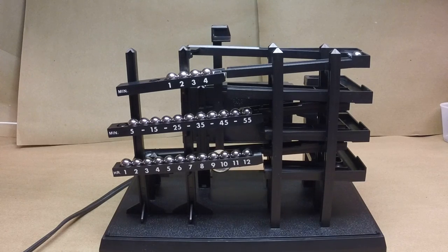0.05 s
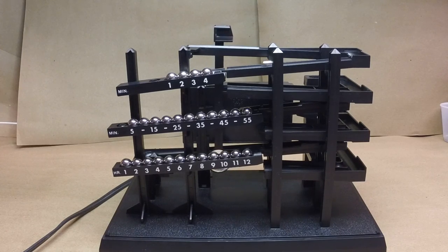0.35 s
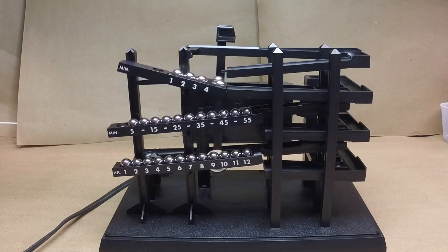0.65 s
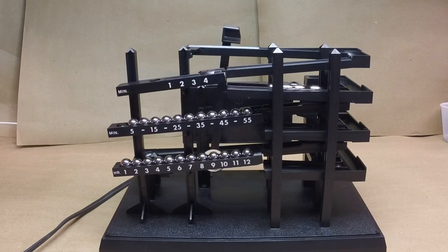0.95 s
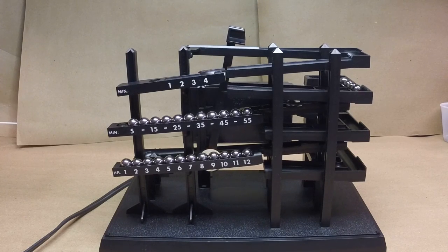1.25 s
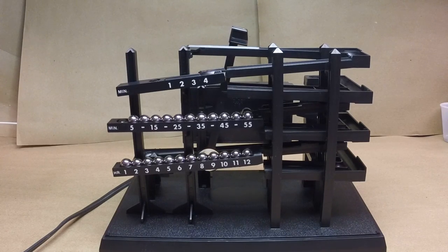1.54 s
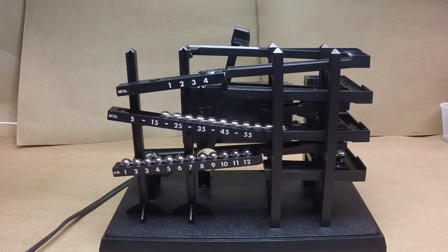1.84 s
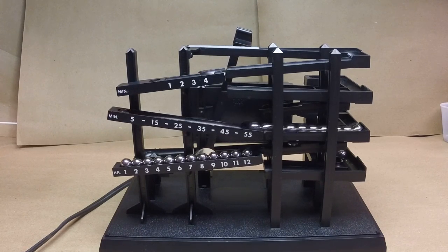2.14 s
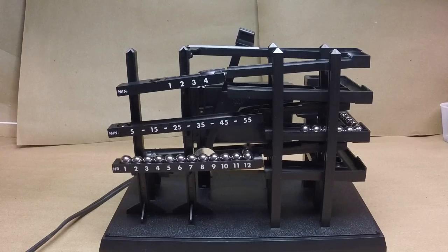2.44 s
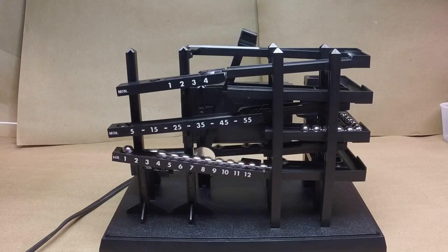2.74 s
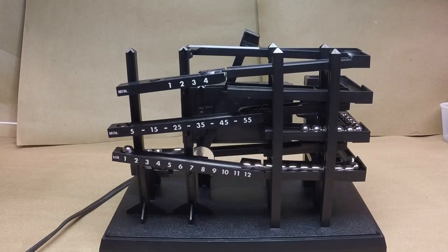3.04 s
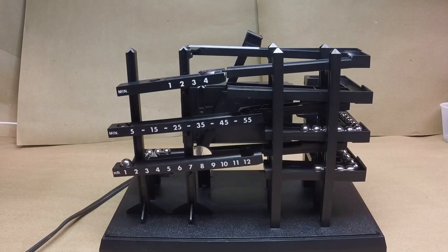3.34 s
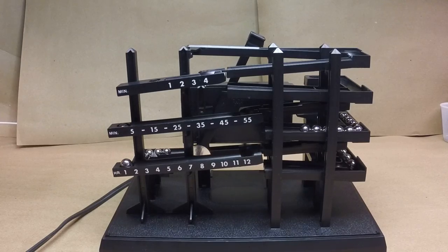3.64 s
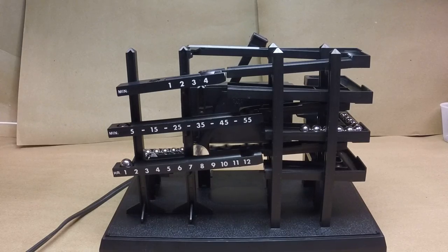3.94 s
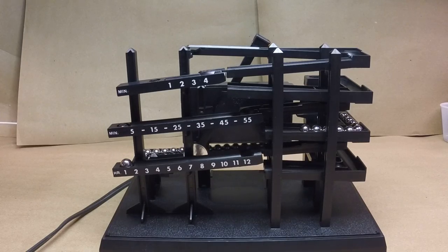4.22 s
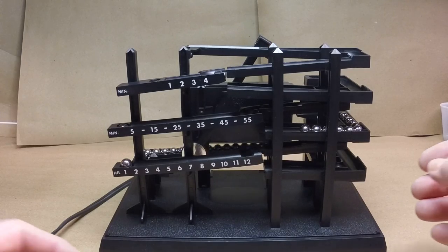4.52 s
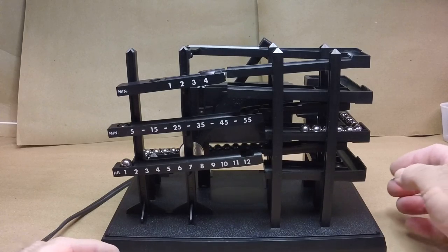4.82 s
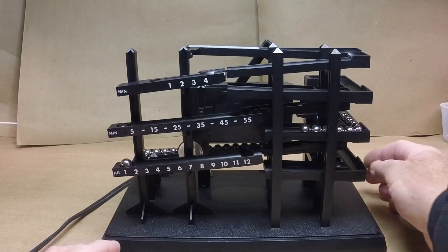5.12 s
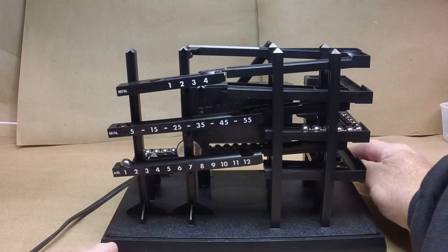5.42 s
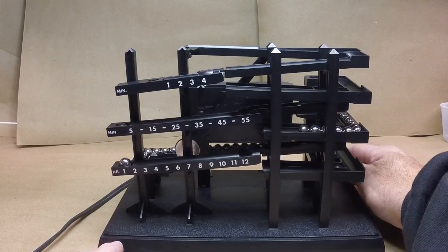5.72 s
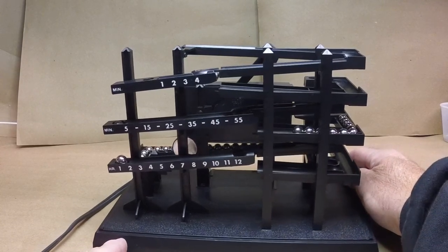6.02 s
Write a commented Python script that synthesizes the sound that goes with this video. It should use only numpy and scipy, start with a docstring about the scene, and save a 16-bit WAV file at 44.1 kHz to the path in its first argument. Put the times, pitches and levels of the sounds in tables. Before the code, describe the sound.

A single steel ball rolls softly along a plastic ramp in a rolling-ball clock. Three rails then tip one after another, releasing trains of balls that rumble and rasp down the ramps, knock on the bends and click into a queue while the frame shudders. After the last few clicks, only a faint gear whirr remains, with one light tap at the end. The microphone is close, in a small quiet room.

```python
"""Rolling-ball clock turning over the hour.

On a table in a small room, one microphone close by. Three plastic rails tip one after another; their
steel balls roll down the ramps, knock on the bends and click into the queue, and the frame shudders.
When the last has landed only the motor's gears whirr on, and a hand nudges the case."""
import sys
import numpy as np
from scipy import signal
from scipy.fft import rfft, irfft
from scipy.io import wavfile
from scipy.ndimage import uniform_filter1d

SR = 44100
rng = np.random.default_rng(int(sys.argv[2]) if len(sys.argv) > 2 else 0)


def master(y):
    """Save y as 16-bit WAV."""
    cut = np.clip(np.atleast_2d(y).T, -1, 1)
    pcm = np.round(cut * 32767)  # scale
    wavfile.write(sys.argv[1], SR, pcm.astype(np.int16))


N = 272097
TIME = np.arange(N) / SR

# A ball strikes a bend or a ramp wall. Each row: start in seconds, level in dB, hardness in dB.
KNOCKS = [(0.9716, -22.5, -2), (1.013, -31, -11.5), (1.082, -24.5, -2.5), (1.1963, -35.5, 1.5),
          (1.2252, -34, -3), (1.514, -31, -3.5), (1.5576, -29.5, 3.5), (1.565, -35.5, 16.5),
          (1.579, -34, 0), (1.64, -24.5, 4), (1.6434, -31, 2.5), (1.6669, -33, -10), (1.6738, -33, 4),
          (1.6798, -26, -12), (1.7006, -24, 1.5), (1.7055, -38.5, 20.5), (1.7289, -37, -2),
          (1.769, -36.5, 6), (1.9646, -29, 2.5), (2.0582, -28.5, -7), (2.088, -31, -8), (2.106, -33, -11),
          (2.127, -35, -4), (2.142, -28, -25), (2.164, -33.5, -4.5), (2.177, -33, -2.5), (2.203, -33, -4),
          (2.2144, -33, -0.5), (2.242, -34, -0.5), (2.258, -36, -2), (2.3222, -24, -12.5),
          (2.6493, -39.5, -1), (2.6594, -33, -2), (2.7069, -37, -3), (2.827, -35, -6.5), (2.9044, -31, -1),
          (3.0341, -28, -17), (3.0958, -33, -4), (3.1179, -37.5, 5.5), (3.1603, -33, -1.5),
          (3.2446, -25.5, -7.5), (3.314, -29.5, -13), (3.431, -37.5, -13), (3.524, -39, -10),
          (3.542, -42, -8), (3.608, -35, -20), (3.622, -40, -23), (3.699, -36, -19), (3.722, -38.5, -15),
          (3.746, -41, -16), (3.866, -38, -21)]
# A tipping beam is bumped or lands on its stop. Each row: start in seconds, level in dB, hardness in dB.
TOCKS = [(0.038, -40.5, -11.5), (0.065, -38.5, -12), (0.087, -36, -28), (0.7255, -21, -14.5),
         (0.764, -27.5, -12.5), (0.7761, -29.5, -7), (0.8617, -27, -5.5), (0.8754, -37, 6.5),
         (0.9072, -31.5, -4.5), (1.1746, -31.5, -1), (1.4778, -28.5, 0), (1.586, -24.5, -8.5),
         (1.739, -22, -16), (1.748, -31.5, -5), (1.763, -26, -6), (1.7868, -35, -11.5), (6.1039, -43.5, -7)]
# A ball runs into the queue. Each row: start in seconds, level in dB, then the favoured pitches of
# rail, rail edge and steel in Hz.
CLICKS = [(0.5378, -48.5, 2000, 4320, 7500), (0.5584, -47.5, 2380, 4300, 7000),
          (0.5801, -52, 2240, 4300, 10500), (0.603, -49, 2310, 4260, 9000),
          (0.6487, -38.5, 2100, 4240, 7400), (0.6654, -45, 2800, 4280, 7000),
          (0.839, -40, 2420, 4500, 9000), (1.1439, -29.5, 2270, 4700, 8440),
          (1.5462, -40.5, 2400, 6000, 6000), (1.6113, -42, 2400, 4700, 7000),
          (1.787, -41, 2400, 4700, 13200), (1.9897, -39, 2200, 5000, 8000),
          (2.0184, -30.5, 2090, 5500, 8550), (2.03, -38, 3090, 5400, 7500), (2.365, -45, 2760, 5000, 10500),
          (2.3773, -39.5, 2500, 5000, 13100), (2.3896, -44, 2790, 5000, 13000),
          (2.4046, -38, 3110, 4660, 10500), (2.416, -43.5, 2400, 4630, 9500), (2.43, -48, 2600, 4700, 9500),
          (2.444, -52, 2400, 4700, 9500), (2.5348, -50.5, 3070, 4400, 8000),
          (2.873, -43.5, 2400, 4700, 12500), (3.0134, -46, 2300, 4700, 9000),
          (3.0378, -43, 2400, 4700, 11000), (3.1422, -39.5, 2390, 4700, 9500),
          (3.1694, -37.5, 2640, 4000, 9500), (3.578, -48.5, 2400, 6200, 6500),
          (3.9258, -43, 2800, 5450, 12500), (3.9818, -39.5, 2500, 5200, 12500),
          (4.0013, -38, 2870, 5000, 12500), (4.0595, -40, 2550, 4800, 12500),
          (4.0814, -40.5, 2800, 4040, 12500), (4.1219, -41, 2890, 5500, 12500),
          (4.1464, -41.5, 2860, 5500, 12500), (4.1944, -39.5, 2540, 4970, 12500),
          (4.2293, -43.5, 2870, 5470, 12500), (4.269, -44, 2840, 5000, 12500),
          (4.346, -43.5, 2510, 4000, 12500)]
# The running balls. Each row: time in seconds, low rumble in dB, rasp in dB.
ROLL_LEVELS = [(0, -47, -58), (0.12, -51, -65), (0.16, -48.5, -56), (0.22, -49.5, -60), (0.28, -45.5, -61),
               (0.32, -39.5, -56.5), (0.42, -45, -55.5), (0.6, -47.5, -57), (0.7, -57, -54),
               (0.88, -39.5, -45.5), (1.2, -41, -46), (1.3, -43, -51.5), (1.5, -40, -47.5),
               (1.69, -35.5, -49), (1.75, -37, -40.5), (1.83, -38.5, -45.5), (1.93, -34, -41.5),
               (2.04, -35, -40), (2.1, -37.5, -41), (2.3, -39, -42.5), (2.41, -40.5, -40),
               (2.5, -47.5, -53.5), (2.68, -44, -49), (2.8, -40.5, -45.5), (2.881, -35.5, -40),
               (3.0, -36, -42), (3.17, -38, -39), (3.22, -41, -42), (3.35, -40, -44), (3.7, -41.5, -46.5),
               (3.82, -42, -45), (4.05, -40.5, -45.5), (4.22, -46, -52.5), (4.33, -44.5, -68)]
# The rub on the top ramp, and the gear whirr. Each row: time in seconds, level in dB.
SQUEAL_LEVELS = [(0.3, -76), (0.38, -63.5), (0.44, -67), (0.5, -63), (0.53, -64), (0.55, -78)]
MOTOR_LEVELS = [(4.45, -65), (4.66, -62), (5.06, -55), (5.95, -54.5), (6.17, -59.5)]
# A load of balls shifts and rocks the frame. Each row: start in seconds, strength in dB.
SHIFTS = [(0.56, -41), (0.85, -45), (1.14, -42.5), (1.56, -38), (1.8, -44), (2.08, -45.5), (2.23, -44),
          (2.45, -44.5), (2.64, -40), (2.86, -55), (3.15, -43), (3.96, -45.5), (4.14, -43.5), (4.31, -50)]
# Resonances of the clock's parts. Each row: frequency in Hz, width in Hz, relative level in dB.
POST_MODES = [(126, 97, -6.5), (221.3, 19, 0), (251.6, 37, -2.5), (342.7, 34, 1)]
TRAY_MODES = [(462, 20.6, -6.5), (511.5, 19.5, -8), (564, 45.4, 0), (617, 34.5, -1), (624, 45.5, -1.5),
              (682.6, 54, -4)]
BEAM_MODES = [(793.4, 34, -4.5), (861, 44, 0), (880.2, 41.5, 2.5), (939, 32.5, -2.5), (1104, 150, -18.5),
              (1233, 61, -14), (1472, 93, -9.5)]
RAIL_MODES = [(1720, 200, -9), (1998, 100, -5), (2190, 170, -4), (2415, 110, -1.5), (2610, 170, -3),
              (2830, 125, 0), (3055, 130, 0)]
EDGE_MODES = [(3270, 200, 0.5), (3880, 350, 1), (4245, 58, 5.5), (4636, 155, 1.5), (5020, 130, -5),
              (5440, 340, -3.5), (6120, 440, -1.5), (6600, 550, -7)]
STEEL_MODES = [(7040, 780, 11), (8260, 930, 4.5), (9120, 180, 4.5), (9500, 150, -3), (10030, 590, 2.5),
               (10800, 180, -14), (12600, 1000, -8), (11800, 1700, 1.5), (14900, 860, 7)]
RAMP_WALL_MODES = [(5540, 80, 0)]
FRAME_MODES = [(112, 14, 0)]
GEAR_MODES = [(748, 91, -1), (868, 72, -0.5), (954, 69, -8.5)]
# The still room at the microphone. Each row: frequency in Hz, relative spectral density in dB.
ROOM_TONE = [(10, -7), (30, 2), (70, 4), (130, 0), (250, -2.5), (500, -7.5), (1200, -14.5), (2500, -19),
             (5000, -24.5), (8000, -30.5), (13000, -35.5), (16000, -35)]
# How each kind of blow shares out. Each lists tray, beam, rail, rail edge and steel in dB.
KNOCK_SHARES = (-2.5, -2, -5, -9, -21.5)
TOCK_SHARES = (-14.5, 0.5, -8.5, -10, -25)
CLICK_SHARES = (0, 1.5, 0.7, -0.5, -11)
# A harder contact lifts the bright parts. It lists the same five parts in dB per dB of hardness.
HARDNESS_LIFT = (0.012, 0.4, 0.98, 0.74, 0.69)

# The bands that the parts radiate, low and high limit in Hz.
POST_BAND, TRAY_BAND, ROLLED_BEAM_BAND, STRUCK_BEAM_BAND = (120, 460), (404, 750), (686, 1246), (567, 2230)
RAIL_BAND, EDGE_BAND, STEEL_BAND = (1650, 3300), (3100, 7000), (6700, 14000)
TICK_BAND, CRACK_BAND, GRAIN_BAND = (9000, 15500), (790, 9000), (1100, 4700)
# On the bottom ramp the balls are clear of the beams and rumble mostly round one tray resonance.
BOTTOM_TRAY_DB, BOTTOM_BEAM_DB, BOTTOM_HZ = 2.5, -3, 585
STILL_ROLLING = np.clip((4.36 - TIME) / 0.05, 0, 1)  # the last ball comes to rest at 4.36 s


def impacts():
    """Every blow rings the posts, trays, tipping beams, rails, rail edges and the steel itself."""
    starts, hardness_db, rail_hz, edge_hz, steel_hz, *levels_db = all_blows().T
    tray_db, beam_db, rail_db, edge_db, steel_db = levels_db
    tray_db = tray_db + BOTTOM_TRAY_DB * bottom_share(starts)
    beam_db = beam_db + BOTTOM_BEAM_DB * bottom_share(starts)
    post_db = 10 * np.log10(from_db(tray_db) ** 2 + from_db(beam_db) ** 2) - 22.5  # posts carry both
    age, count = np.arange(SR // 15) / SR, len(starts)
    post = struck(contact(age, count, buzz_s=0.014, snap=0.39), POST_MODES, POST_BAND)
    tray_force = contact(age, count, buzz_s=0.0031, snap=1.0)
    tray = struck(tray_force, TRAY_MODES, TRAY_BAND, focus_hz=590)
    beam_force = soften(contact(age, count, buzz_s=0.0079, snap=0.96), hardness_db)
    beam = struck(beam_force, BEAM_MODES, STRUCK_BEAM_BAND, focus_hz=870, damping=0.92, focus_db=14.5)
    rail_force = contact(age, count, buzz_s=0.011, snap=0.29)
    rail = struck(rail_force, RAIL_MODES, RAIL_BAND, focus_hz=rail_hz, damping=1.12)
    edge_force = contact(age, count, buzz_s=0.0088, snap=0.046)
    edge = struck(edge_force, EDGE_MODES, EDGE_BAND, focus_hz=edge_hz, focus_db=9)
    steel_force = contact(age, count, buzz_s=0.012, snap=0.25)
    steel = struck(steel_force, STEEL_MODES, STEEL_BAND, focus_hz=steel_hz)
    parts = [(post_db, post), (tray_db, tray), (beam_db, beam),
             (rail_db, rail), (edge_db, edge), (steel_db, steel)]
    blows = sum(from_db(db)[:, None] * part for db, part in parts)
    out = np.zeros(N + len(age))
    for start, blow in zip((starts * SR).astype(int), blows):
        out[start:start + len(age)] += blow
    return out[:N]


def all_blows():
    """Knocks, tocks, clicks and the jostling between them, one row a blow."""
    knock_s, knock_db, hardness_db = np.transpose(KNOCKS)
    knock_hz = np.where(hardness_db > 1, 2980, 2710)  # hard knocks ring the top rail modes
    click_s, click_db, *click_pitches = np.transpose(CLICKS)
    return np.vstack([shared_out(KNOCK_SHARES, knock_s, knock_db, hardness_db, rail_hz=knock_hz),
                      shared_out(TOCK_SHARES, *np.transpose(TOCKS), rail_hz=2400),
                      shared_out(CLICK_SHARES, click_s, click_db, 0, *click_pitches),
                      jostles()])


def jostles(count=200, per_s=28, spread_db=2.5, train_rasp_db=-40.5):
    """A long, fast train of balls clicks against itself at random, a little softer than it rasps."""
    gap_chance, level_chance = rng.random((count, 2)).T
    starts = np.cumsum(0.5 + gap_chance) / per_s
    roll_s, _, roll_rasp_db = np.transpose(ROLL_LEVELS)
    rasp_db = np.interp(starts, roll_s, roll_rasp_db)
    level_db = rasp_db - 3 + spread_db * np.sqrt(3) * (1 - 2 * level_chance)
    blows = shared_out(CLICK_SHARES, starts, level_db, hardness_db=0, rail_hz=2450)
    return blows[rasp_db > train_rasp_db]


def shared_out(shares_db, starts, db, hardness_db, rail_hz, edge_hz=4770, steel_hz=9000):
    """Spread blows over the parts. Each row: start, hardness, three pitches, five part levels."""
    starts, hardness_db, *pitches = np.broadcast_arrays(starts, hardness_db, rail_hz, edge_hz, steel_hz)
    levels_db = db[:, None] + shares_db + np.outer(hardness_db, HARDNESS_LIFT)
    return np.column_stack([starts, hardness_db, *pitches, levels_db])


def contact(age, count, buzz_s, snap):
    """Force of each impact: one sharp touch, then a dying buzz of ball against plastic."""
    buzz = rng.standard_normal((count, len(age))) * np.exp(-age / buzz_s)
    return buzz / np.sqrt(buzz_s * SR / 2) + snap * (age == 0)


def soften(force, hardness_db, db_per_octave=11.5):
    """The softer the contact, the lower its force is cut off."""
    corners_hz = np.clip(2500 * 2 ** (hardness_db / db_per_octave), 950, SR / 4)
    return np.array([signal.sosfilt(signal.butter(6, hz, fs=SR, output="sos"), push)
                     for push, hz in zip(force, corners_hz)])


def struck(force, modes, band_hz, focus_hz=None, damping=1, focus_db=12):
    """Each blow rings the modes with strengths of its own; rms 1 over the first 20 ms."""
    ringing = 0
    for hz, width, db in modes:
        strength_db = db + 3 * rng.standard_normal((len(force), 1))
        if focus_hz is not None:  # where the ball lands favours one region of modes
            octaves_away = np.abs(np.log2(hz / focus_hz)).reshape(-1, 1)
            strength_db = strength_db - focus_db * octaves_away
        side = rng.choice([-1, 1], (len(force), 1))  # which side of a nodal line is hit
        ringing = ringing + side * from_db(strength_db) * resonance(force, hz, width * damping)
    ringing = radiate(ringing, band_hz)
    return ringing / np.std(ringing[:, :SR // 50], axis=1, keepdims=True)


def ticks():
    """Steel meeting steel squarely adds a short, very high tick and a dry crack."""
    out, age = np.zeros(N), np.arange(SR // 20) / SR
    for start_s, db, _, _, steel_hz in CLICKS:
        squareness = (steel_hz / TICK_BAND[1]) ** 1.23
        start = int(start_s * SR)
        for band_hz, share_db in ((TICK_BAND, -11.5), (CRACK_BAND, -6.5)):
            burst = radiate(contact(age, count=1, buzz_s=0.0078, snap=0.17)[0], band_hz)
            burst /= np.std(burst[:SR // 50])
            out[start:start + len(age)] += from_db(db + share_db) * squareness * burst
    return out


def rolling():
    """The jolts of the running balls feed the same resonances as the blows: a rumble and a rasp."""
    weight, rasp = gains_in_time(ROLL_LEVELS)
    on_bottom = bottom_share(TIME)
    tray_gain = weight * from_db(BOTTOM_TRAY_DB * on_bottom)
    beam_gain = weight * from_db(BOTTOM_BEAM_DB * on_bottom + 0.18)
    lurch = from_db((3.375 - 1.77 * on_bottom) * drift(per_s=55))  # the bottom ramp is the smoothest
    post = rolled(bumps(4000, 0.96, lurch), POST_MODES, POST_BAND)
    tray = rolled(bumps(4000, 0.24, lurch), TRAY_MODES, TRAY_BAND, narrowing_db=36 * on_bottom)
    beam = rolled(bumps(4000, 0.5, lurch), BEAM_MODES, ROLLED_BEAM_BAND)
    rail = rolled(bumps(3500, 0.64, lurch), RAIL_MODES, RAIL_BAND)
    edge = rolled(bumps(3500, 0.94, lurch), EDGE_MODES, EDGE_BAND)
    steel = rolled(bumps(5000, 3.5, lurch), STEEL_MODES, STEEL_BAND)
    grain = rms_one(radiate(bumps(3000, 2.1, lurch), GRAIN_BAND))
    brightness = (rasp / from_db(-44)) ** 0.76  # a fast train rasps brighter than one slow ball
    treble = brightness * (from_db(-5.5) * edge + from_db(-20.5) * steel)
    grit = rasp * (from_db(-0.3) * rail + from_db(-5.5) * grain + treble)
    rumble = tray_gain * (from_db(-0.74) * tray + from_db(-17.5) * post) + beam_gain * beam
    return (rumble + grit) * STILL_ROLLING


def bumps(per_s, spread_db, lurch):
    """Tiny random jolts of balls crossing the grain of the plastic."""
    sizes = from_db(spread_db * np.minimum(rng.exponential(1, N), 4)) * rng.standard_normal(N)
    return sizes * (rng.random(N) < per_s / SR) * lurch


def rolled(jolts, modes, band_hz, narrowing_db=0, even_s=0.067, evenness=0.76):
    """The balls pass nodes and bellies of each mode: the colour shifts, the level stays fairly even."""
    ringing = 0
    for k, (hz, width, db) in enumerate(modes):
        strength_db = db + 2.05 * drift(per_s=12) - narrowing_db * abs(np.log2(hz / BOTTOM_HZ))
        ringing = ringing + (-1) ** k * from_db(strength_db) * resonance(jolts, hz, width)
    ringing = rms_one(radiate(ringing, band_hz))
    power = uniform_filter1d(ringing ** 2, int(even_s * SR)) + 1e-6
    return rms_one(ringing / power ** (evenness / 2))


def bottom_share(seconds, entry_s=3.205, crossing_s=0.12):
    """How far the balls have passed on to the bottom ramp, 0 to 1."""
    return np.clip((seconds - entry_s) / crossing_s, 0, 1)


def shudder(rise_s=0.015, t60=0.8):
    """The rolling and shifting weight keeps the frame rocking at its lowest resonance."""
    sway = signal.hilbert(ringing_noise(FRAME_MODES))
    sway = rms_one(sway.real / np.sqrt(np.abs(sway)))  # many balls together push fairly evenly
    _, rasp = gains_in_time(ROLL_LEVELS)
    pushes = [from_db(-8.5) * rasp * STILL_ROLLING]
    for start_s, db in SHIFTS:
        age = np.maximum(TIME - start_s, 0)
        pushes.append(np.minimum(age / rise_s, 1) * from_db(db - 60 * age / t60))
    return np.linalg.norm(pushes, axis=0) * sway


def squeal():
    """The first ball rubs the side of its ramp and sings thinly."""
    rubbing = (TIME > SQUEAL_LEVELS[0][0]) & (TIME < SQUEAL_LEVELS[-1][0])
    return rubbing * gains_in_time(SQUEAL_LEVELS)[0] * ringing_noise(RAMP_WALL_MODES)


def motor():
    """The gears that lift the arm whirr in their housing."""
    return from_db(0.5) * gains_in_time(MOTOR_LEVELS)[0] * ringing_noise(GEAR_MODES)


def reflections(direct, t60, wet_db, build_s):
    """Diffuse sound off the walls builds up at the microphone and dies away."""
    age = np.arange(SR // 2) / SR
    build_up = 1 - np.exp(-(age / build_s) ** 2)
    tail = rng.standard_normal(len(age)) * from_db(-60 * age / t60) * build_up
    return from_db(wet_db) * signal.fftconvolve(direct, tail / np.linalg.norm(tail))[:N]


def room_tone(level_db=-52.5):
    """The low, steady hush of the room behind the clock."""
    hz, db = np.transpose(ROOM_TONE)
    bins_hz = np.maximum(np.arange(N // 2 + 1) * SR / N, 1)
    gains = from_db(np.interp(np.log(bins_hz), np.log(hz), db))
    return from_db(level_db) * rms_one(irfft(rfft(rng.standard_normal(N)) * gains, N))


def ringing_noise(modes):
    """Noise drives parallel resonances of alternating sign; rms 1."""
    force = rng.standard_normal(N)
    return rms_one(sum((-1) ** k * from_db(db) * resonance(force, hz, width)
                       for k, (hz, width, db) in enumerate(modes)))


def resonance(force, hz, width):
    """One mode, gain 1 at its centre."""
    radius = np.exp(-np.pi * width / SR)
    poles = [1, -2 * radius * np.cos(2 * np.pi * hz / SR), radius ** 2]
    return (1 - radius ** 2) / 2 * signal.lfilter([1, 0, -1], poles, force + 1e-18)


def radiate(x, band_hz):
    """A part is a poor loudspeaker outside its own band."""
    return signal.sosfilt(signal.butter(3, band_hz, "band", fs=SR, output="sos"), x)


def drift(per_s):
    """A random wander of rms 1 that turns per_s times a second."""
    knots = rng.standard_normal(4000)
    return rms_one(np.interp(TIME * per_s, np.arange(len(knots)), knots))


def gains_in_time(rows):
    """Each dB column of a curve as a gain per sample."""
    seconds, *columns = np.transpose(rows)
    return [from_db(np.interp(TIME, seconds, db)) for db in columns]


def from_db(db):
    """Decibels to gain."""
    return 10 ** (np.asarray(db) / 20)


def rms_one(x):
    """Scale a signal to rms 1."""
    return x / np.sqrt(np.mean(x ** 2) + 1e-20)


def scene():
    """The clock close up, with light reflections and the still room behind it, in mono."""
    balls = impacts() + ticks() + rolling() + squeal()
    air = room_tone()
    walls = reflections(balls, t60=0.42, wet_db=-11.5, build_s=0.011)
    return (balls + walls + shudder() + motor() + air)[None]


def record(dry):
    """The microphone rolls off above 14 kHz and is cut steeply at 15.6 kHz."""
    dull = signal.sosfilt(signal.butter(8, 14000, fs=SR, output="sos"), dry)
    return signal.sosfilt(signal.ellip(10, 0.1, 80, 15600, fs=SR, output="sos"), dull)


dry = scene()
out = record(dry)
master(out)
```